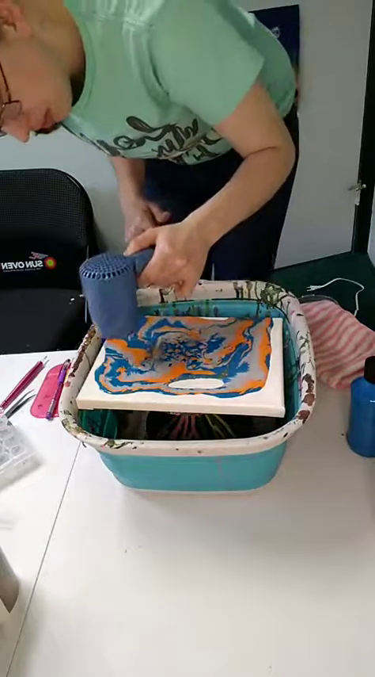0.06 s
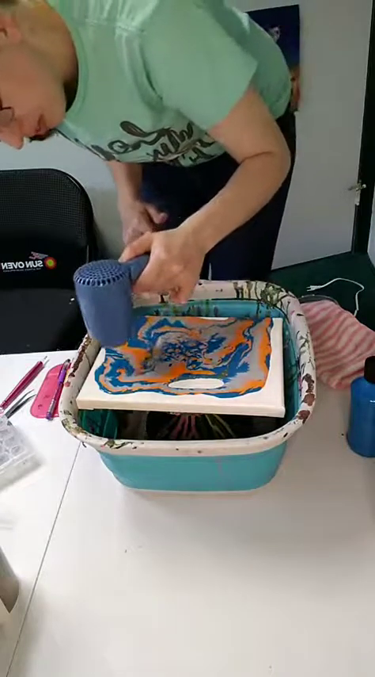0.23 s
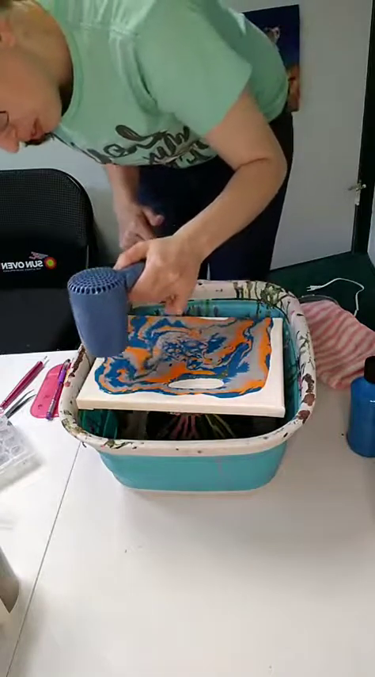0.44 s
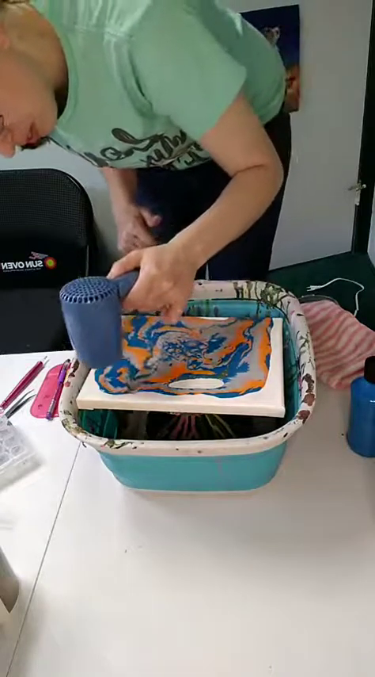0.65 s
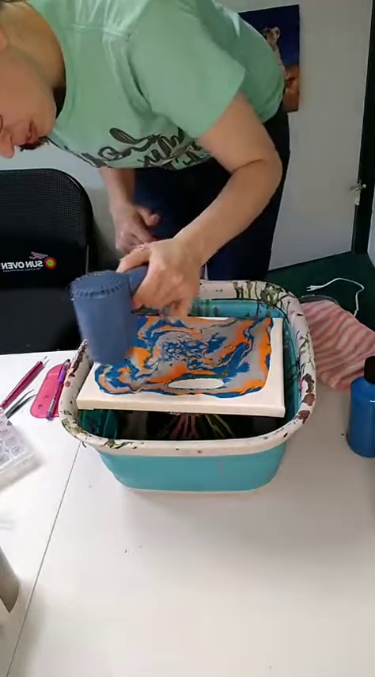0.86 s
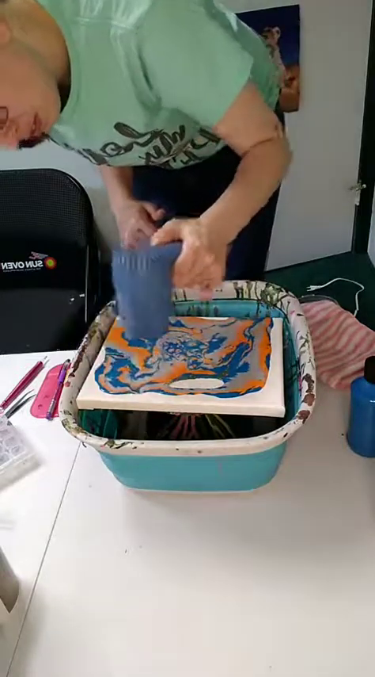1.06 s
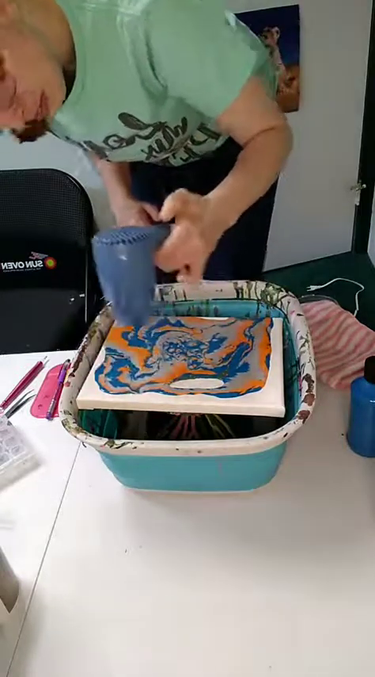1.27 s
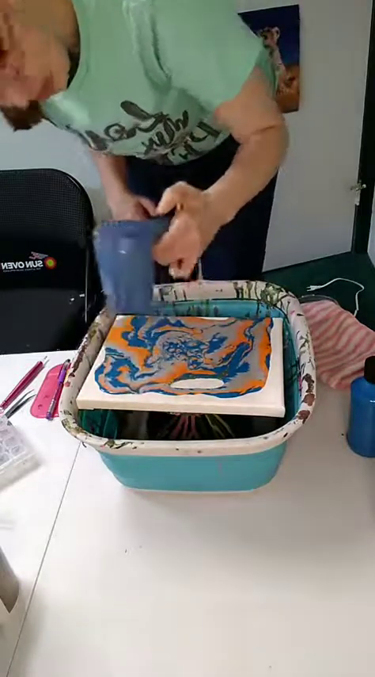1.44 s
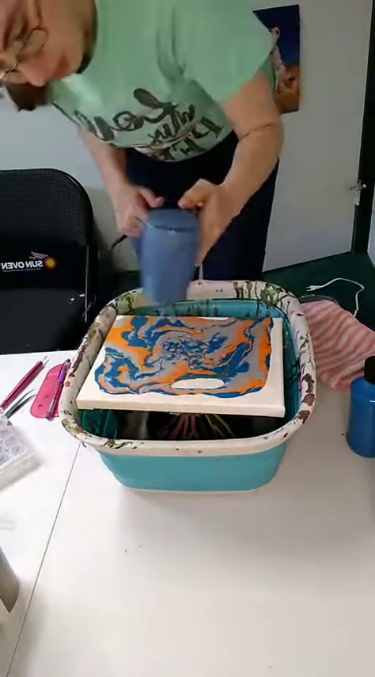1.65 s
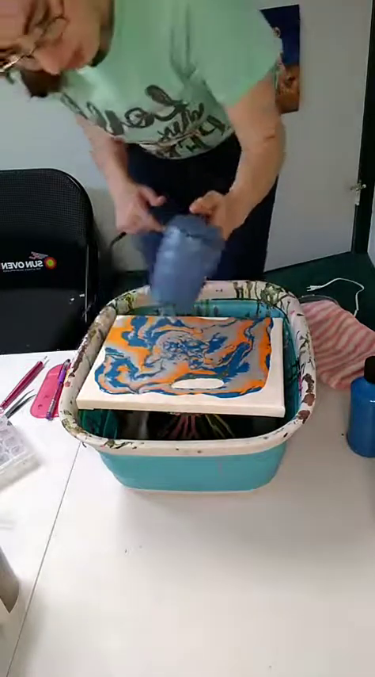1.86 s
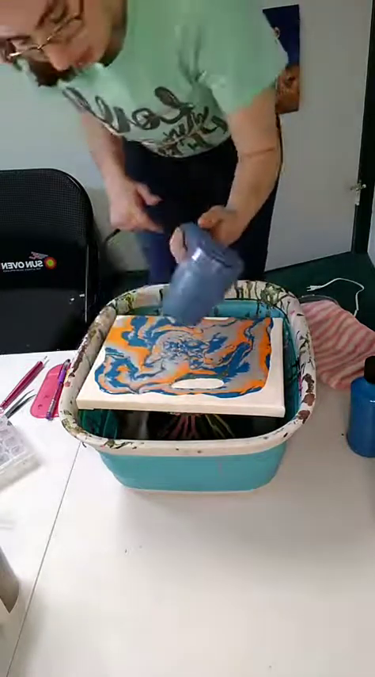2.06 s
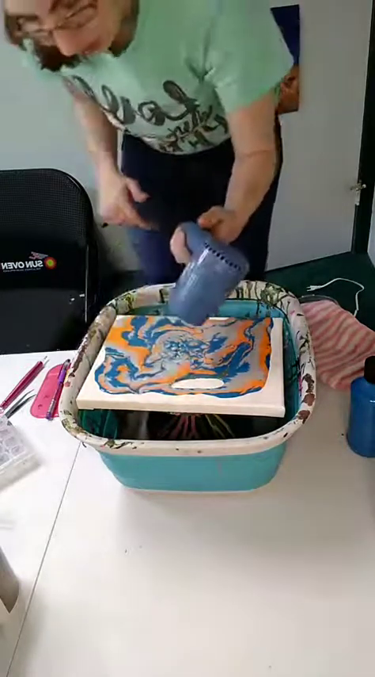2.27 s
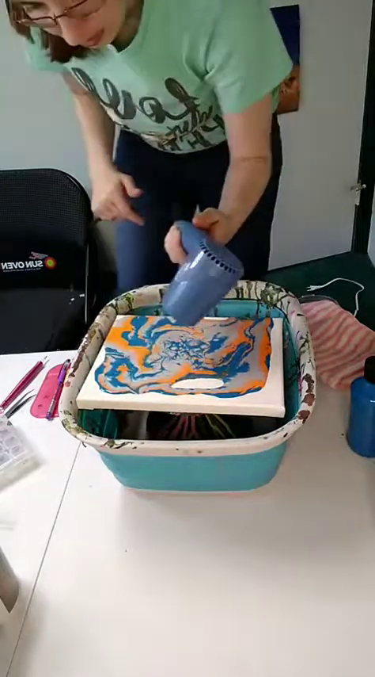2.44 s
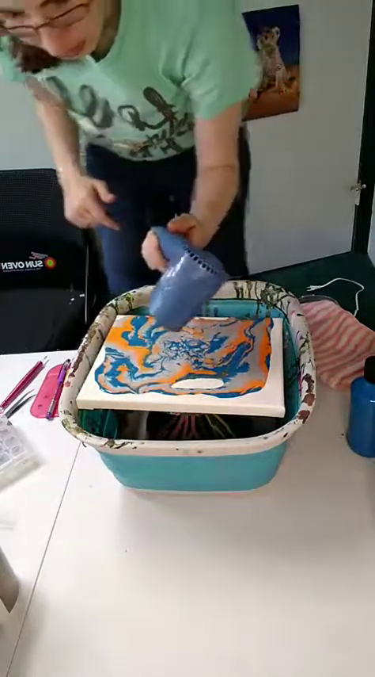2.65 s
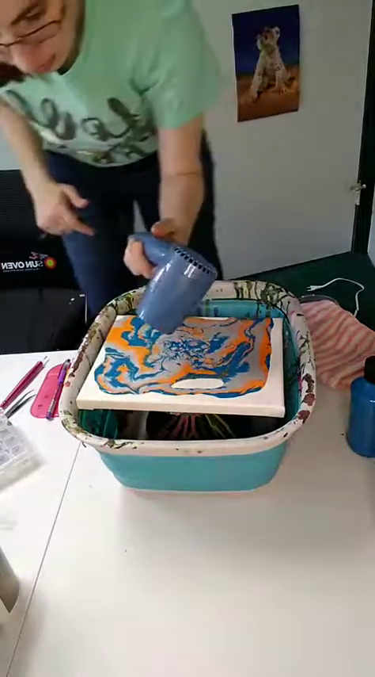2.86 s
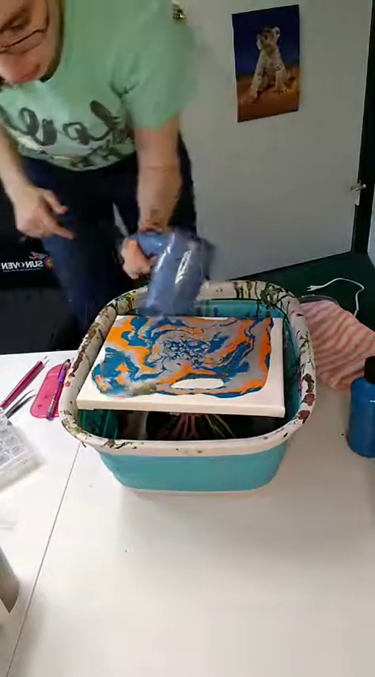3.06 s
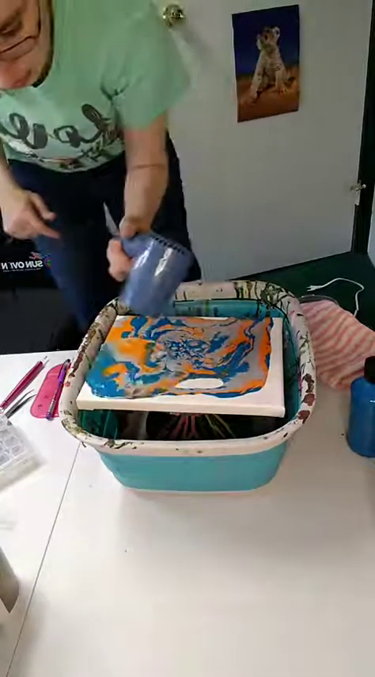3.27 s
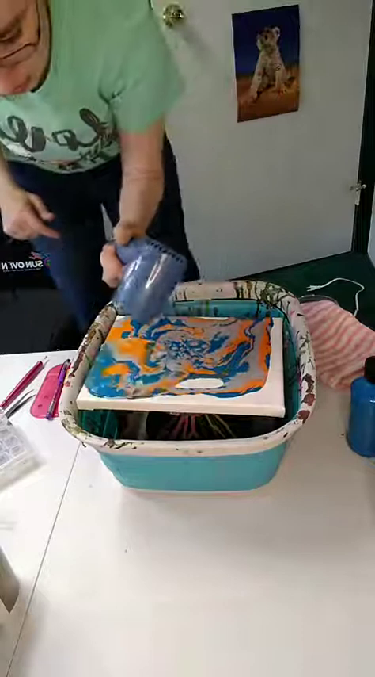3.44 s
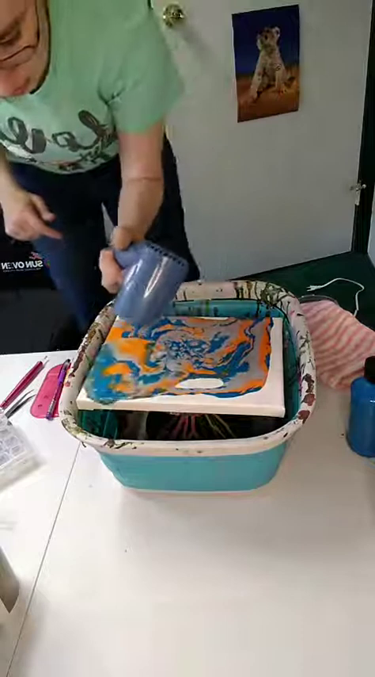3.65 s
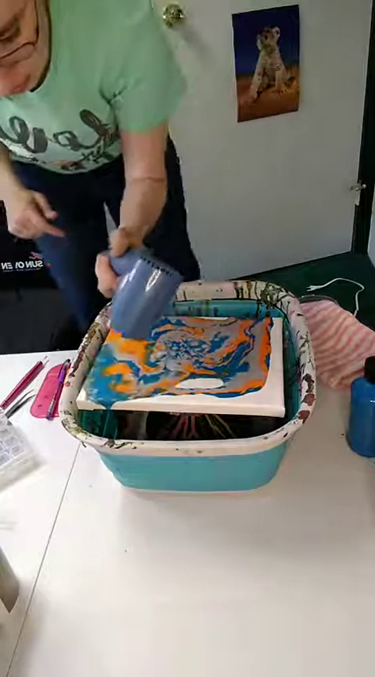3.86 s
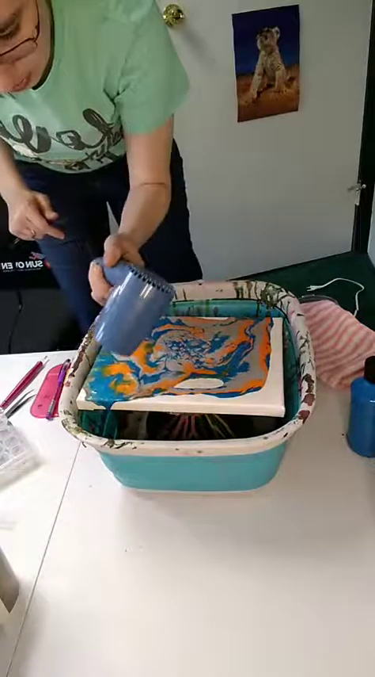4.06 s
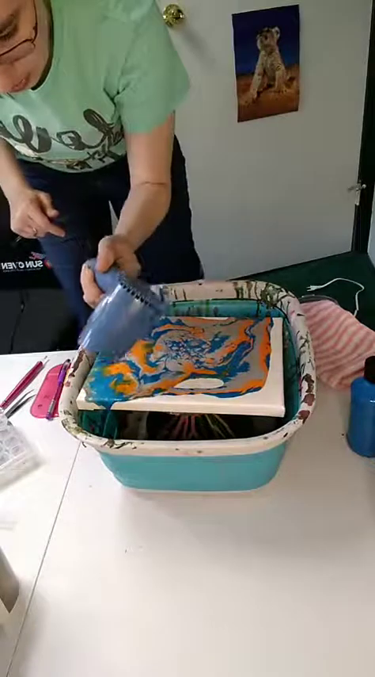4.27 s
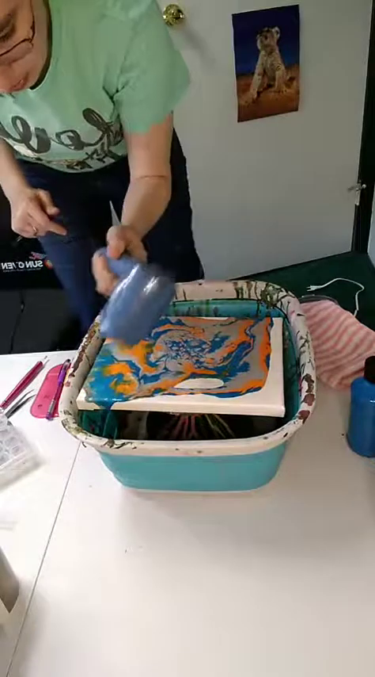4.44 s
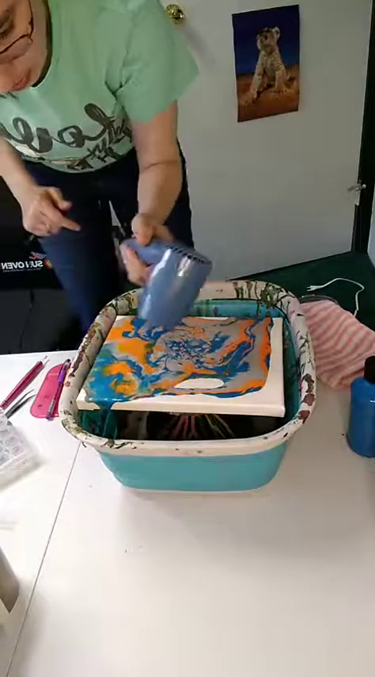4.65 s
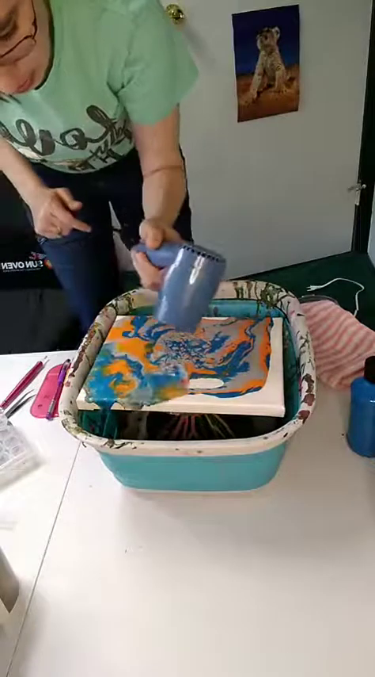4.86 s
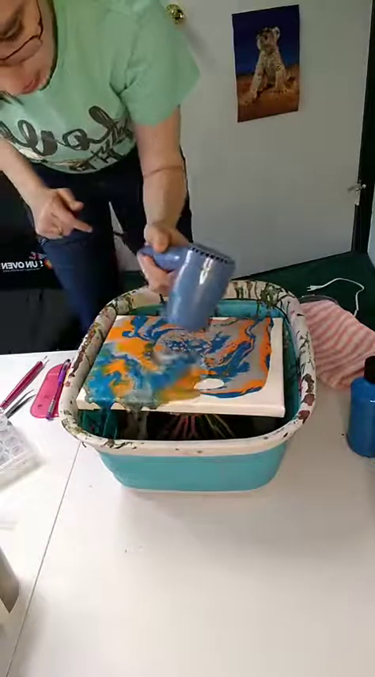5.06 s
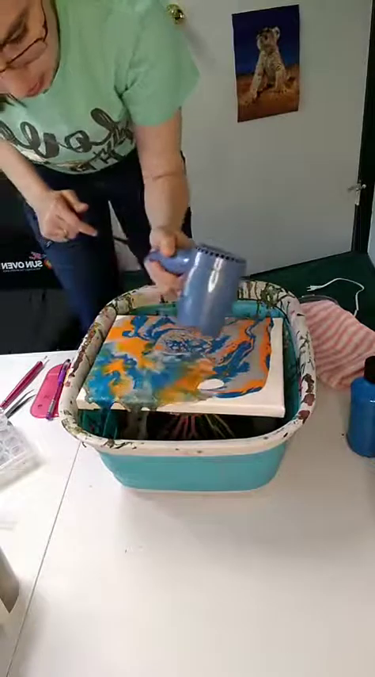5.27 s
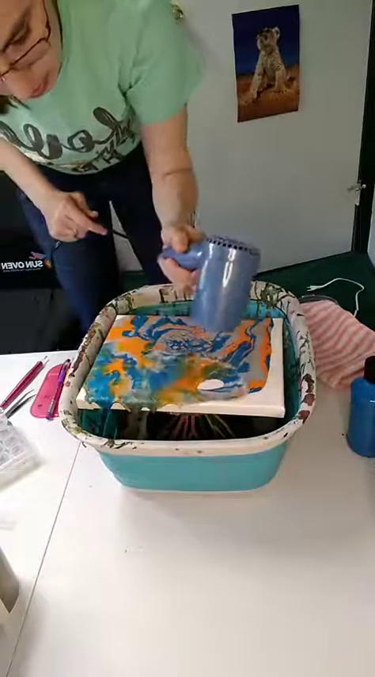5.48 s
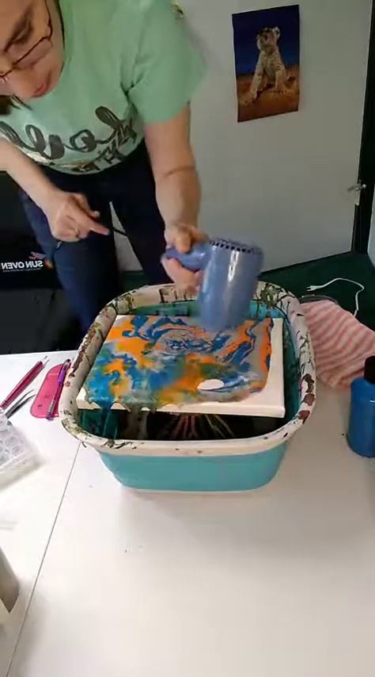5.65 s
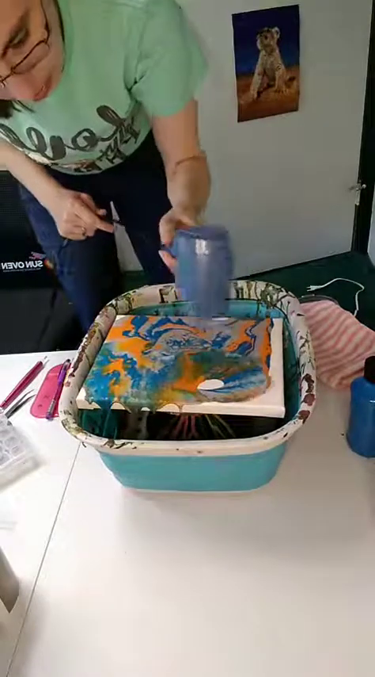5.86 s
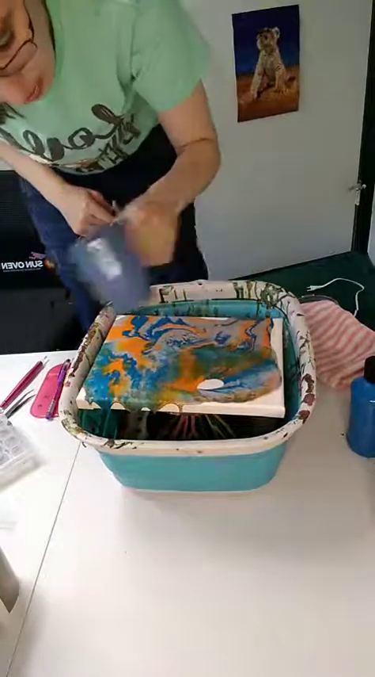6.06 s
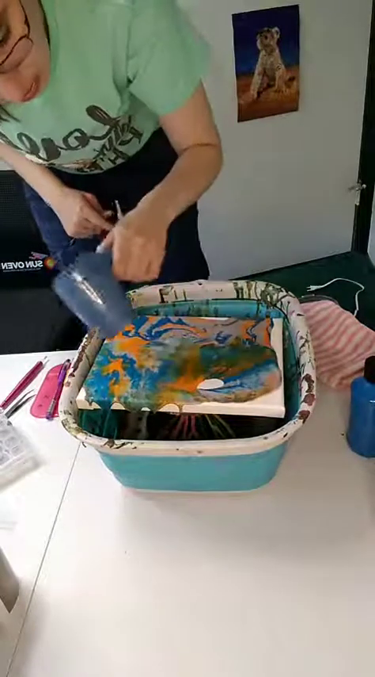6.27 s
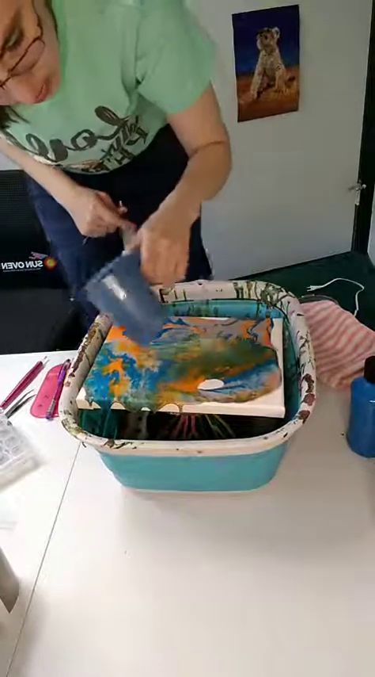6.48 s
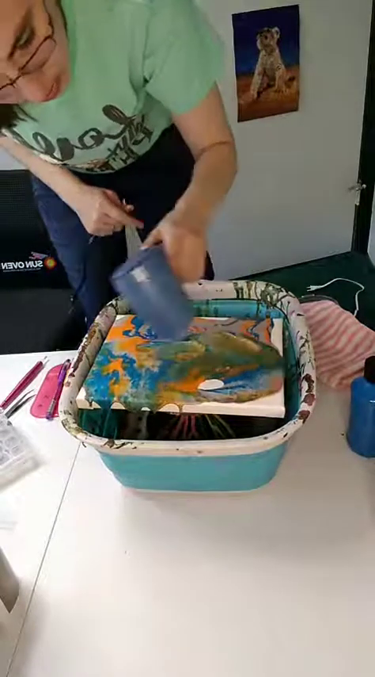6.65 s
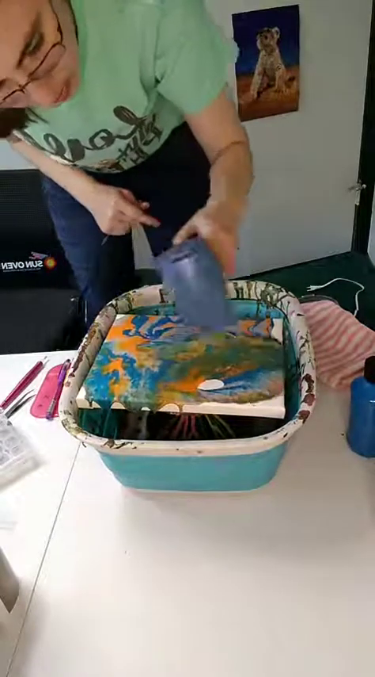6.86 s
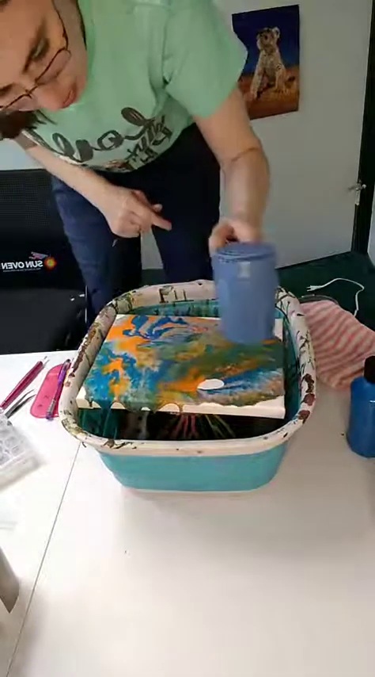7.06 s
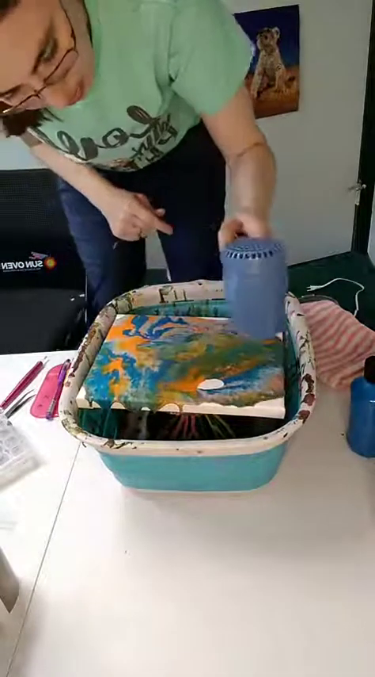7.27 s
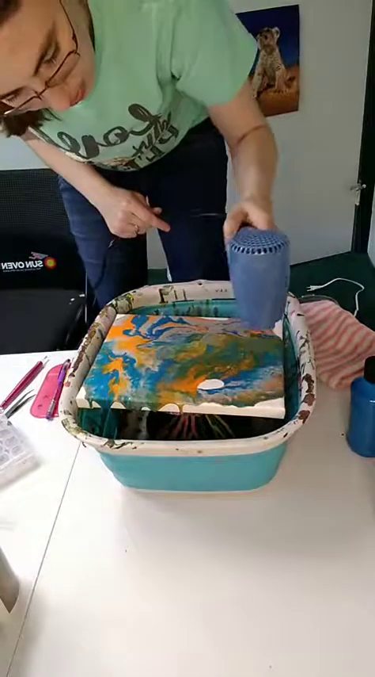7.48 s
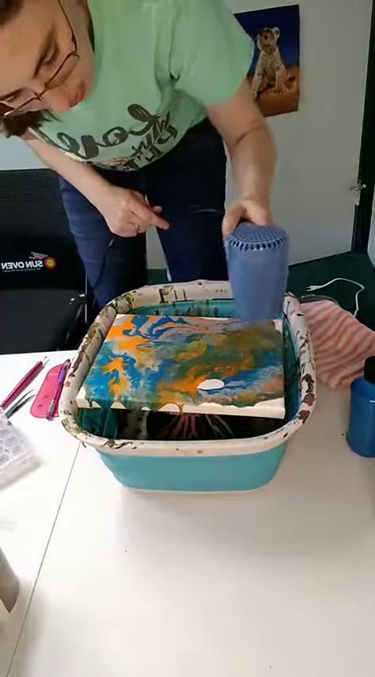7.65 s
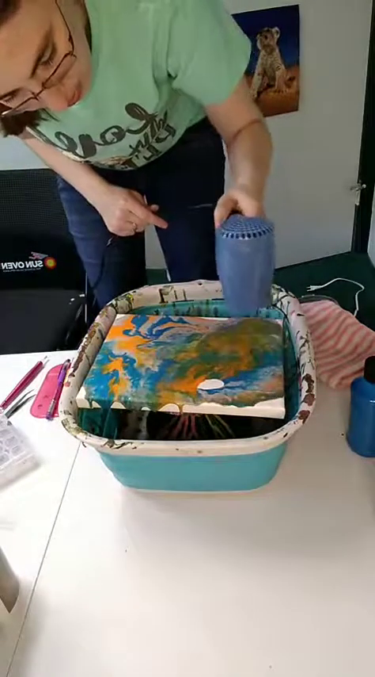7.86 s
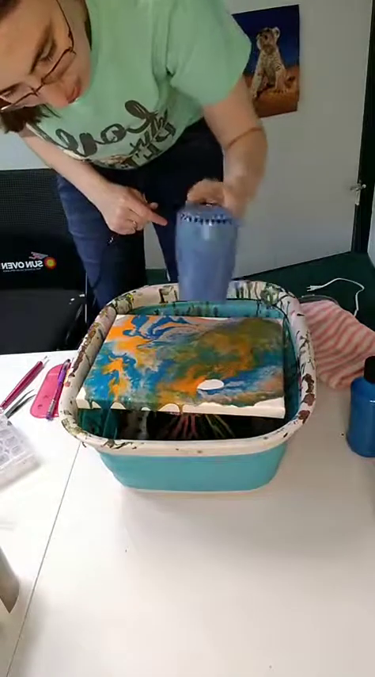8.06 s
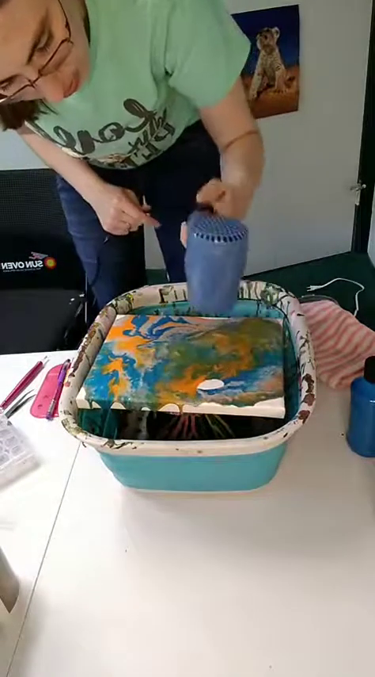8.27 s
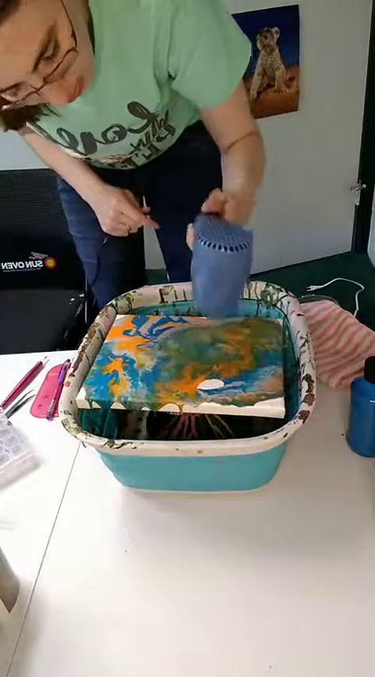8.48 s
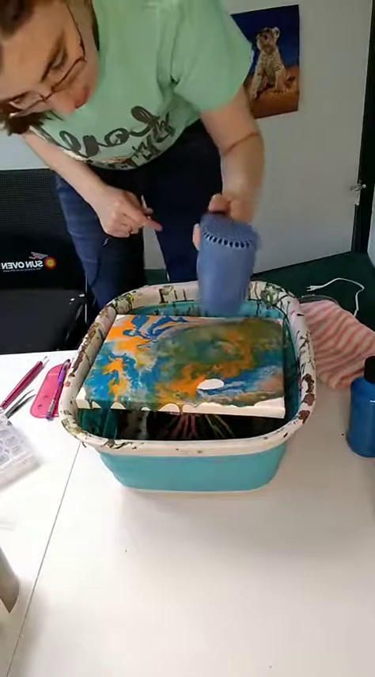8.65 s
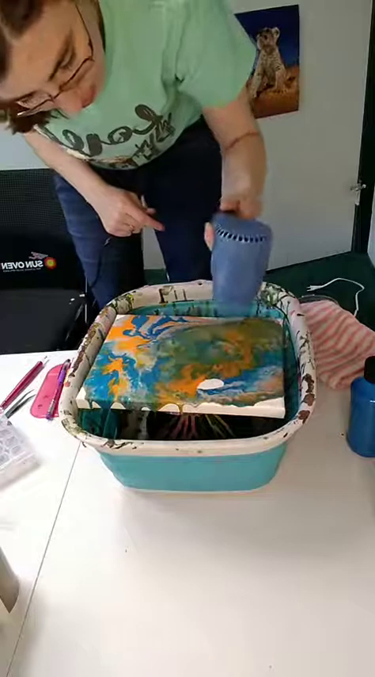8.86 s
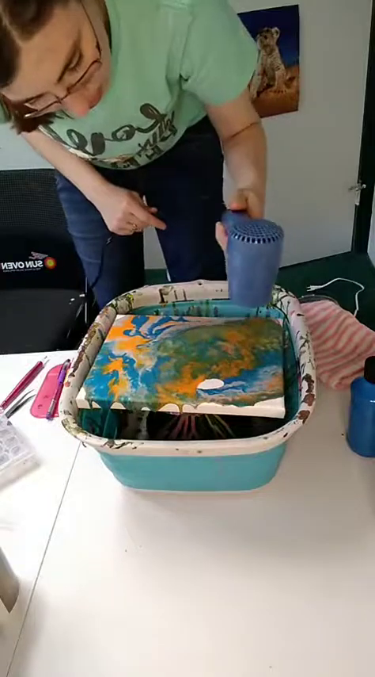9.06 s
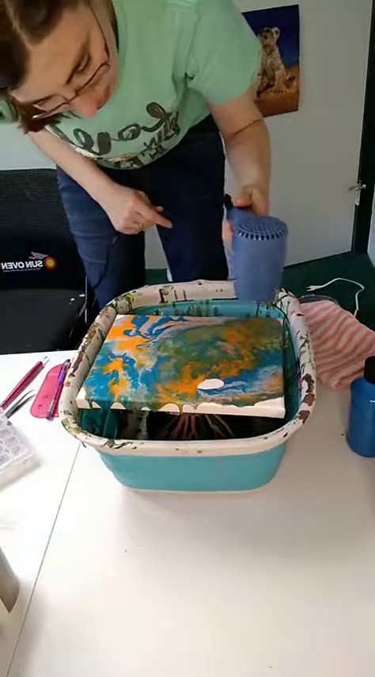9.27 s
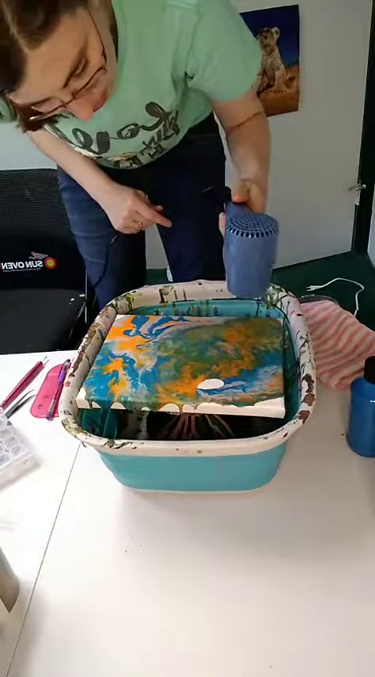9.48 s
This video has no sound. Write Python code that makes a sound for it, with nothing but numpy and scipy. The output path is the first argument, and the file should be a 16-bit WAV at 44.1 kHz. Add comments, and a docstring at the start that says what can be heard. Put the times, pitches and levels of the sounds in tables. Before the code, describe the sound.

A handheld dryer runs on low with faint hoots of air against a canvas. The motor is switched off and slides down in pitch for half a second, with a small click, then jumps to a strong, hissing roar with wavering whistles. Later the roar gradually weakens, another click comes, and the low rush returns. Dry, close phone sound in a small quiet room.

```python
"""A steady rush of air on low: a small hair dryer blows on a canvas in a small room, a metre from a phone.
Switched off, it coasts down; then it clicks on to high, and later drops back to low.
The air is noise coloured by the barrel's resonances, and a seven-blade fan adds whining tones.
Short swells of narrow noise make the jet's hoots on the canvas and soft bumps of handling.
Around them are a ring of the housing, the clicks of the switch and the quiet air of the room."""
import sys
import numpy as np
from scipy import signal
from scipy.fft import rfft, irfft, next_fast_len
from scipy.io import wavfile
from scipy.ndimage import uniform_filter1d, map_coordinates

SR = 44100
rng = np.random.default_rng(int(sys.argv[2]) if len(sys.argv) > 2 else 0)


def wav_out(sig):
    """Save sig, one row per channel (or a flat mono array), as 16-bit PCM at SR to the path in sys.argv[1]."""
    wavfile.write(sys.argv[1], SR, np.round(np.clip(np.atleast_2d(sig).T, -1, 1) * 32767).astype(np.int16))


N = 419832  # samples, about 9.5 s
T = np.arange(N) / SR  # time of each sample, s
SIZE = next_fast_len(N + 8192)  # length of the Fourier transforms, samples
HZ = np.fft.rfftfreq(SIZE, 1 / SR)

# The motor. Turns per second that each switch position leads to: position, turns_per_s
TURNS = {"off": 0, "low": 171.6, "high": 276.6}
# Time the rotor needs to settle in each position: position, lag_s
LAG_S = {"off": .43, "low": 0.36, "high": .098}
# The thumb moves the switch, passing through off between high and low: start_s, position
SWITCH_MOVES = [(2.201, "off"), (2.762, "high"), (8.51, "off"), (8.77, "low")]
SAG_PER_S = 0.0008  # share of its goal speed that the motor loses each second in one position

# The hand turns the barrel: time_s, upright_share (0 tilted, 1 upright)
UPRIGHT = [(0, 0), (2.72, 0.23), (2.85, 0.019), (6.6, 0.025), (7.15, 1), (7.6, 0.87), (8.52, 0.6),
           (8.7, 0.89), (9.52, 0.93)]

# Smooth colour of the air, relative level per Hz in four postures:
# pitch_hz, tilted_low_db, tilted_high_db, upright_low_db, upright_high_db
AIR = [(25.0, -48.5, -54.0, -44.0, -54.0), (45.0, -44.5, -51, -39.5, -43), (86, -29, -31, -30, -30),
       (227, -31, -24, -26.5, -29.5), (454, -23, -18, -23.5, -18), (620, -22, -22.5, -25, -26),
       (902, -18.5, -19.5, -22.5, -18.5), (1100, -10.5, -10.5, -11.5, -14),
       (1780, -14.0, -9.5, -19.5, -11.5), (2160, -15.5, -11, -20.5, -13.5), (4110, -16, -9, -22.5, -11.5),
       (8070, -33.5, -22, -30, -23.5), (9800, -30.5, -18.5, -30, -21), (13100, -30, -23.5, -30.5, -24.5)]
# Resonances of barrel, grille and the gap over the canvas, lifts in the same four postures:
# pitch_hz, width_hz, tilted_low_db, tilted_high_db, upright_low_db, upright_high_db
RESONANCES = [(160, 60, 0.0, 3.5, 3.0, 3.0), (278, 26, 2.0, 1.5, 8.0, 4.5), (335, 30, 6.5, 3.0, 6.0, 4.5),
              (470, 110, -1.0, 0.5, 6.0, 6.0), (560, 70, -1.0, -1.0, 0.0, 4.0),
              (756, 36, 6.0, 8.5, 3.0, -1.5), (810, 70, 6.5, 5.0, 4.5, 0.0), (1000, 90, 0.0, 0.5, 3.5, 6.0),
              (1145, 70, 8.0, 4.5, 1.0, 0.0), (1205, 45, 10.5, 7.5, 3.5, 6.5),
              (1255, 36, 5.0, 3.0, 2.5, 6.0), (1325, 60, 8.0, 4.5, 4.0, 6.5),
              (1480, 80, 0.5, 2.0, 5.5, 9.0), (1560, 80, 6.0, 1.0, 7.5, 0.5),
              (1660, 40, 0.5, 4.5, 0.0, 6.0), (1805, 80, 2.0, 5.0, 0.0, 2.0),
              (2220, 120, 0.0, 6.0, 2.0, 6.0), (2620, 170, 1.0, 2.5, 1.5, 8.0),
              (2930, 230, 5.0, 4.0, 5.5, 6.5), (3500, 450, -1.0, -2.0, 0.0, -2.0),
              (3970, 140, 4.5, 0.0, 1.0, 0.0), (4230, 350, 2.0, 3.5, 3.0, 3.5)]
# Four parts of the air stream, low to high: jet on the canvas, barrel roar, grille rush, hiss.
# Columns: base_level_db (at full speed, before the swell), speed_power, swell_share, churn_db,
# splash_db (added churn when blowing hard straight down)
STREAM = [(-39.5, 2.93, 1.08, 1.0, 2.6), (-22.5, 2.64, 1.19, 0.58, 1.9), (-21, 3.13, 1.03, 0.55, 0.26),
          (-24.5, 3.23, 1.12, -0.27, -0.8)]
# Borders between those four parts: edge_hz
STREAM_EDGES_HZ = [650, 1700, 5500]
# Beyond what speed explains, the sound swells on high and sinks back: time_s, body_db, treble_db
SWELL = [(0, -7.5, -9.5), (2.2, -8.5, -10), (2.5, -6, -11), (2.72, -9, -9), (2.82, 0, -0.5),
         (3.3, -.3, 0.03), (5.1, .5, 0.26), (6.05, 0.05, 0), (6.45, 0, -1.45), (7.05, -3, -1.5),
         (7.6, -5, -3), (8.0, -8, -6.8), (8.2, -10.5, -9), (8.52, -9.5, -8.5), (8.75, -7.5, -12),
         (9.52, -10, -12.5)]
# How wide the sound is, side against mid: pitch_hz, side_db
WIDTH = [(20, -70), (3200, -84), (3900, -32.5), (5000, -2), (8000, -6), (13000, -4)]

# The two lowest blade tones swell and fade as the dryer is swung, before trim and speed are added:
# time_s, first_db, second_db
WHINE = [(3.15, -46, -30), (3.22, -42, -34), (3.8, -40, -27), (3.88, -34, -32), (4.04, -37, -36),
         (5.29, -29.5, -36), (5.73, -36, -23), (6.38, -24, -36), (6.52, -31, -28), (6.71, -40, -41),
         (6.85, -30, -26), (7.11, -60, -34), (7.16, -36, -35), (7.65, -36.5, -29.5), (7.81, -38, -39),
         (8.1, -45, -27), (8.28, -55, -44), (8.5, -50, -31)]
FIRST_TRIM_DB, SECOND_TRIM_DB = -1.6, -3
FIRST_POWER, SECOND_POWER = 4.8, 7.1  # the tones grow with these powers of speed
# On low the blade tone meets the barrel's main resonance
BARREL_HZ, BARREL_WIDTH_HZ, BARREL_LIFT_DB = 1205, 316, 24
# Upper harmonics leave as narrow beams that sweep past the phone, before the motor load is added:
# middle_s, length_s, level_db
THIRD_BEAMS = [(4.65, 0.18, -34), (5.32, .1, -41), (6.26, 0.12, -30), (6.66, .15, -35), (6.92, 0.26, -40),
               (7.28, 0.12, -38)]
FOURTH_BEAMS = [(3.75, .45, -36), (4.27, 0.31, -36), (4.96, 0.55, -35), (5.58, 0.39, -35.5),
                (5.96, .11, -36), (6.33, 0.12, -39), (6.88, 0.082, -37.5), (7.23, 0.13, -34.5),
                (7.76, 0.63, -39)]
# What spills outside the beams, against the grille rush at full speed
THIRD_SPILL_DB, FOURTH_SPILL_DB = -41, -38
WHISTLE_DB, FIFTH_DB = 1.5, -8  # whistle pair and fifth harmonic, against the fourth's beam level
FOLD_HZ = 8000  # crossover of the phone's two audio bands
# Weak motor tones, before the motor load is added: shaft_multiple, level_against_grille_rush_db
MOTOR = [(1, -37.5), (6, -32), (8, -40)]
PULL_DB, COAST_DB = 3, -6  # change of the whine while speeding up hard, and while coasting

# The housing sings as the motor coasts: time_s, level_db
SING = [(2.44, -95), (2.49, -55), (2.58, -64), (2.68, -79), (2.78, -54), (2.84, -95)]
SING_HZ = 938
# Snaps of the slide switch: start_s, level_db
SWITCH = [(2.381, -49), (2.72, -42.5), (8.765, -45)]
# Colour of a snap, relative level per Hz: pitch_hz, level_db
CLICK = [(150, -25), (600, -14), (1200, 1), (2500, -6), (4700, 0), (7000, -4), (8000, -15), (9500, -3),
         (13000, -9)]
# The jet catches an edge and hoots briefly: middle_s, length_s, pitch_hz, level_db
FLUTTERS = [(.052, 0.033, 1176, -32.5), (.195, .032, 744, -53), (.21, 0.054, 1170, -34),
            (.235, 0.036, 365, -55), (.36, .035, 810, -48), (.8, .04, 336, -56.5), (3.41, 0.093, 1170, -25),
            (6.5, .16, 1163, -26), (7.02, 0.14, 1280, -24), (7.23, .042, 1310, -29),
            (7.51, 0.053, 1456, -27.5), (7.54, 0.046, 480, -39), (7.61, 0.035, 2200, -38),
            (7.68, .069, 1520, -30), (7.83, 0.085, 1490, -29), (7.87, .12, 2650, -35),
            (7.945, 0.013, 1500, -24.5), (8.015, .053, 1040, -32.5), (8.11, 0.068, 1170, -29.5),
            (8.315, .032, 1270, -24.5), (8.34, 0.056, 2620, -28.5), (8.48, 0.069, 4230, -28)]
# Soft bumps of handling: middle_s, length_s, pitch_hz, level_db
BUMPS = [(2.64, 0.043, 149, -59), (9.05, .04, 90, -64), (9.27, .05, 85, -60)]
# Colour of the still room air, relative level per Hz: pitch_hz, level_db
ROOM = [(25, -22), (80, -3), (170, -1), (400, 0), (1000, -10), (4000, -32), (13000, -45)]


def amp(db):
    """Turn decibels into gain."""
    return np.exp(np.asarray(db) * (np.log(10) / 20))


def unit(x):
    """Scale x to an average (rms) strength of 1."""
    return x / np.sqrt(np.mean(x ** 2) + 1e-20)


def along(points):
    """Join (Hz, value) points into a value for every frequency, on a log axis."""
    hz, values = np.transpose(points)
    return np.interp(np.log(HZ + 1), np.log(hz + 1), values)


def curves(rows):
    """Give one value per sample for each column after the time."""
    times, *columns = np.transpose(rows)
    return [np.interp(T, times, column) for column in columns]


def wobble(rate):
    """Draw a smooth random curve through rate random points a second."""
    points = rng.standard_normal(int(N * rate / SR) + 4)
    coarse_t = T[::32]
    return np.interp(T, coarse_t, map_coordinates(points, [coarse_t * rate]))


def filtered(x, gain):
    """Apply a gain to every frequency of x."""
    return irfft(rfft(x, SIZE) * gain, SIZE)[..., :N]


def noise(gain):
    """Make coloured noise as (mid, side), the mid at strength 1; only the treble is wide."""
    white = rng.standard_normal((2, 2 * len(HZ))).view(complex)
    widths = [np.ones_like(HZ), amp(along(WIDTH))]
    x = irfft(white * gain * widths, SIZE)[:, :N]
    return x / (np.std(x[0]) + 1e-20)


def shaft_speed():
    """Turns per second: after each switch move the rotor eases towards its new speed."""
    speed = np.full(N, TURNS["low"])
    for start, position in SWITCH_MOVES:
        age = np.maximum(T - start, 0)
        goal = TURNS[position] * (1 - SAG_PER_S * age)
        speed_at_move = np.interp(start, T, speed)
        eased = goal + (speed_at_move - goal) * np.exp(-age / LAG_S[position])
        speed = np.where(T < start, speed, eased)
    return speed


def speed_db(speed):
    """Shaft speed in dB against full speed."""
    return 20 * np.log10(speed / TURNS["high"])


def flow_levels(speed):
    """Level in dB of each part of the air stream: a power of shaft speed, plus the slow swell."""
    body_db, treble_db = curves(SWELL)
    swells = [body_db, body_db, treble_db, treble_db]
    return [base_db + power * speed_db(speed) + share * swell_db
            for (base_db, power, share, _, _), swell_db in zip(STREAM, swells)]


def air_colour(posture):
    """The smooth spectrum of the air in one posture, lifted at each resonance."""
    slope_db = along([(row[0], row[1 + posture]) for row in AIR])
    lift_db = sum(row[2 + posture] / (1 + (2 * (HZ - row[0]) / row[1]) ** 2) for row in RESONANCES)
    return amp(slope_db + lift_db)


def echo(x, delay, sway, strength):
    """A surface returns a copy whose delay in seconds drifts with the hand: a moving comb filter."""
    late_t = T - delay * (1 + sway * wobble(1.5))
    copy = np.array([np.interp(late_t, T, channel, left=0) for channel in x])
    return (x + strength * copy) / np.hypot(1, strength)


def air(speed):
    """Turbulent air is noise; its colour follows the shaft speed and the angle of the barrel."""
    upright = np.clip(curves(UPRIGHT)[0], 0, 1)
    high = np.interp(speed, [TURNS["low"], TURNS["high"]], [0.08, 0.99])
    tilted, low = 1 - upright, 1 - high
    # square roots let the four separate noises blend at even power
    shares = np.sqrt([tilted * low, tilted * high, upright * low, upright * high])
    stream = sum(share * noise(air_colour(k)) for k, share in enumerate(shares))
    stream = echo(stream, delay=0.0031, sway=0.0777, strength=0.2)  # the table
    stream = echo(stream, delay=0.0085, sway=0.0303, strength=0.21)  # the wall behind
    stream = echo(stream, delay=0.013, sway=0.0313, strength=0.23)  # the ceiling

    # differences of these low-pass gains split the stream into its four parts
    below = [0] + [1 / (1 + (HZ / hz) ** 12) for hz in STREAM_EDGES_HZ] + [1]
    gusts_db = 0.14 * wobble(22)
    weights = shares ** 2
    out = 0
    for k, level_db in enumerate(flow_levels(speed)):
        band = filtered(stream, below[k + 1] - below[k])
        # even out the postures to strength 1 before the flow sets the level
        posture_power = weights @ band[0] ** 2 / weights.sum(axis=1)
        power = posture_power @ weights
        *_, churn_db, splash_db = STREAM[k]
        eddies_db = (churn_db + splash_db * upright * high) * wobble(24)
        out = out + band / np.sqrt(power) * amp(level_db + eddies_db + gusts_db)
    return out


def vary_treble(x, depth_db):
    """Vary the treble's level at random in small patches of time and pitch."""
    hz, _, spectrum = signal.stft(x, SR, nperseg=256)
    patches = rng.standard_normal(spectrum.shape[1:])
    patches = uniform_filter1d(patches, size=12, axis=0)
    patches = uniform_filter1d(patches, size=11, axis=1)
    treble = np.interp(hz, [3500, 5500], [0, 1])[:, None]
    gain = amp(depth_db * treble * unit(patches))
    return signal.istft(spectrum * gain, nperseg=256)[1][:, :N]


def tone(phase, level_db):
    """A tone as (mid, side) with an empty side; its strength and phase waver at random."""
    shaken = phase + 0.42 * wobble(45)  # radians
    waver_db = 2.1 * wobble(26)
    return np.sqrt(2) * amp(level_db + waver_db) * np.array([np.sin(shaken), np.zeros(N)])


def beams(rows, spill_db):
    """Level in dB of a beamed harmonic: a flat-topped swell for each pass, over the spill."""
    coarse_t = T[::64]
    passes = sum(amp(db) / (1 + (2 * (coarse_t - middle) / length) ** 6) for middle, length, db in rows)
    return 20 * np.log10(np.hypot(np.interp(T, coarse_t, passes), amp(spill_db)))


def motor_load_db(speed):
    """A motor that is speeding up whines more, one that is slowing whines less."""
    gain_per_s = np.gradient(speed) * SR
    smooth = uniform_filter1d(gain_per_s, size=1500)
    return np.interp(smooth, [-60, 0, 250], [COAST_DB, 0, PULL_DB])  # turns per second, each second


def fan(speed, swing_db):
    """Seven blades chop the air into a tone with overtones; the motor adds faint shaft tones."""
    shaft = 2 * np.pi * np.cumsum(speed * (1 + 0.0007 * wobble(11))) / SR  # phase in radians
    blade = 7 * shaft
    rush_db = flow_levels(speed)[2]

    first, second = [db + power * speed_db(speed) + swing_db * wobble(7)
                     for db, power in zip(curves(WHINE), [FIRST_POWER, SECOND_POWER])]
    detune_hz = 7 * speed - BARREL_HZ
    first = first + BARREL_LIFT_DB / (1 + (2 * detune_hz / BARREL_WIDTH_HZ) ** 2)
    spill_db = rush_db + 2.5 * speed_db(speed)
    third = beams(THIRD_BEAMS, spill_db + THIRD_SPILL_DB)
    fourth = beams(FOURTH_BEAMS, spill_db + FOURTH_SPILL_DB)

    out = tone(blade, first + FIRST_TRIM_DB)
    out += tone(2 * blade, second + SECOND_TRIM_DB)
    out += tone(3 * blade, third)
    whistle = 4 * blade
    # the whistle has a twin, mirrored about the crossover of the phone's two audio bands
    twin = 2 * np.pi * 2 * FOLD_HZ * T - whistle
    out += tone(whistle, fourth + WHISTLE_DB) + tone(twin, fourth + WHISTLE_DB)
    out += tone(5 * blade, fourth + FIFTH_DB)
    out += sum(tone(multiple * shaft, rush_db + db) for multiple, db in MOTOR)
    out *= amp(motor_load_db(speed))
    # the tones' treble spreads to the sides and drifts at random in width
    out[1] = filtered(out[0], 1j * amp(along(WIDTH))) * wobble(4)
    return out


def housing():
    """The housing rings thinly at one pitch, swelling and fading while the motor runs down."""
    level_db, = curves(SING)
    sounding = (T > SING[0][0]) & (T < SING[-1][0])
    return sounding * tone(2 * np.pi * SING_HZ * T, level_db)


def switch(t60, snap_db):
    """Each snap is a noise burst fading by 60 dB in t60 seconds, plus a fainter, very short one."""
    level = np.zeros(N)
    age = np.arange(SR // 2) / SR
    fade = amp(-60 * age / t60) + amp(snap_db - 60 * age / 0.008)
    for start, db in SWITCH:
        level[round(start * SR):][:len(age)] += amp(db) * fade
    return level * noise(amp(along(CLICK)))


def puffs(rows, width):
    """Short swells of narrow noise; width is the bandwidth as a share of the pitch."""
    lead = SR // 4  # room for each swell to rise before its middle
    t = np.arange(-lead, lead) / SR
    hz = np.fft.rfftfreq(len(t), 1 / SR)
    out = np.zeros((2, N + SR))
    for middle, length, pitch, db in rows:
        narrow = 1 / (1 + (2 * (hz / pitch - 1) / width) ** 4)
        ring = irfft(rfft(rng.standard_normal(len(t))) * narrow, len(t))
        swell = np.exp(-2 * (t / length) ** 2)
        ring /= np.sqrt(np.average(ring ** 2, weights=swell ** 2))
        out[0, round(middle * SR):][:len(t)] += amp(db) * ring * swell
    return out[:, lead:lead + N]


def jet_flutters():
    """The jet catches an edge and hoots: noise narrow enough to have a pitch."""
    return puffs(FLUTTERS, width=0.11)


def handling_bumps():
    """Handling makes soft, dull thuds: broader swells of low noise."""
    return puffs(BUMPS, width=0.69)


def room_air():
    """The still air of the room is faint, steady noise, mostly low in pitch."""
    return amp(-73.5) * noise(amp(along(ROOM)))


def scene():
    """The dryer, the hand that holds it and the quiet room, as left and right."""
    speed = shaft_speed()
    dryer = vary_treble(air(speed), depth_db=2.16) + fan(speed, swing_db=1.0)
    dryer = dryer + housing() + switch(t60=0.26, snap_db=-22)
    mid, side = dryer + jet_flutters() + handling_bumps() + room_air()
    return np.array([mid + side, mid - side])


def record(dry):
    """The phone sheds deep bass, dips slightly at its crossover and keeps nothing above its band limit."""
    dip_db = -1.8 / (1 + ((HZ - FOLD_HZ) / 450) ** 2)
    bass = HZ / np.hypot(HZ, 15)
    return filtered(dry, bass * amp(dip_db) * (HZ < 13120))


dry = scene()
out = record(dry)
wav_out(out)
```